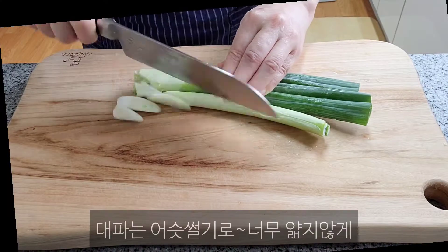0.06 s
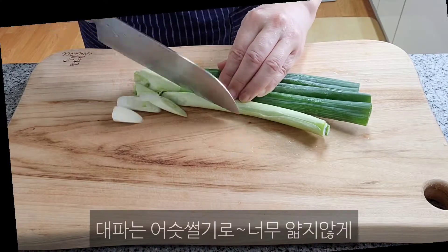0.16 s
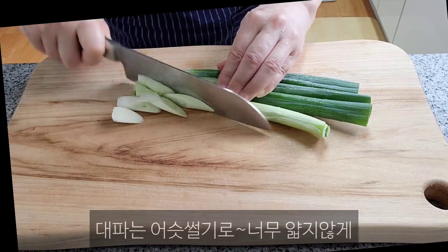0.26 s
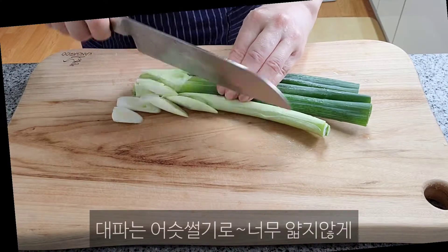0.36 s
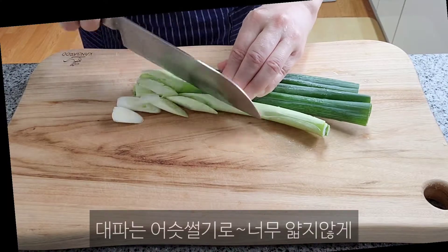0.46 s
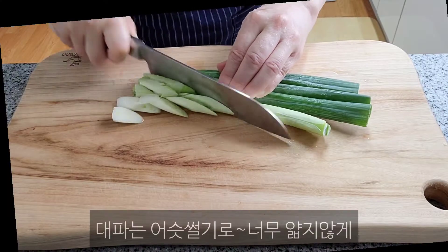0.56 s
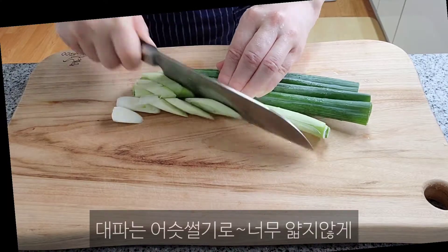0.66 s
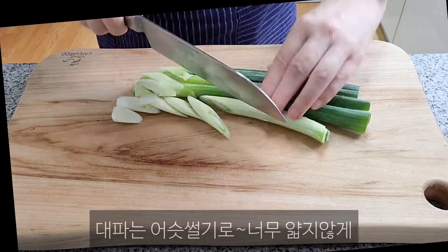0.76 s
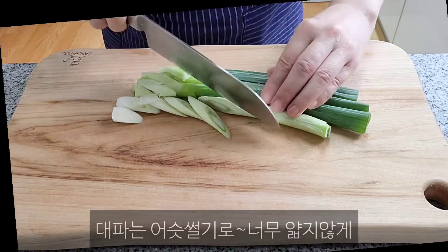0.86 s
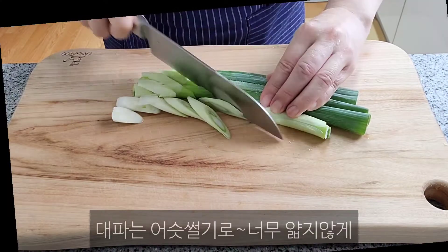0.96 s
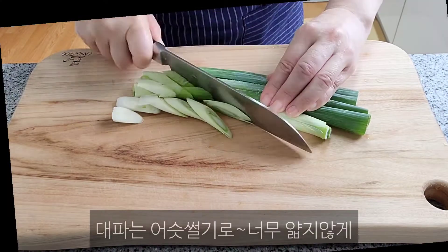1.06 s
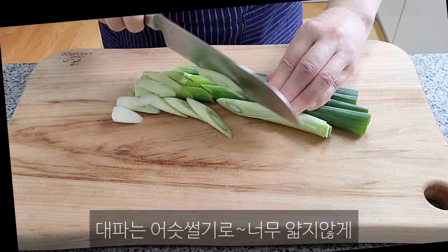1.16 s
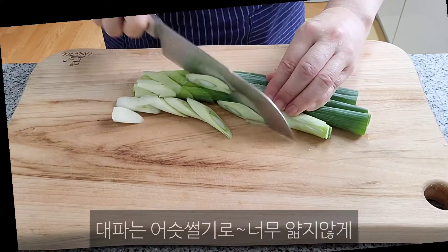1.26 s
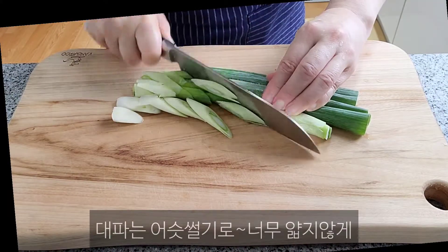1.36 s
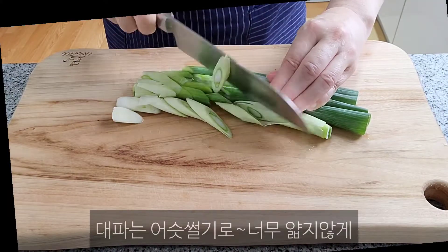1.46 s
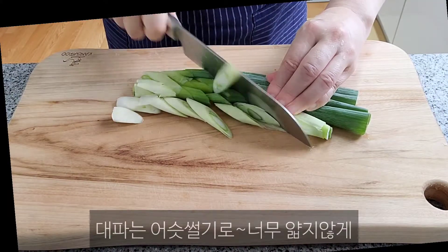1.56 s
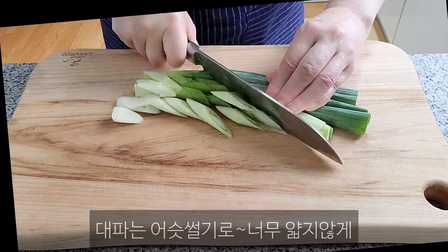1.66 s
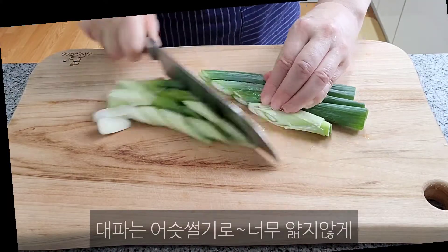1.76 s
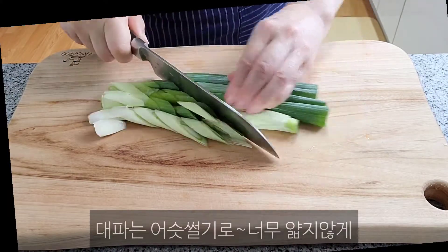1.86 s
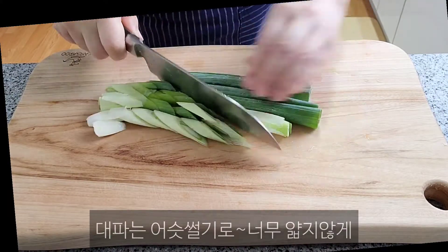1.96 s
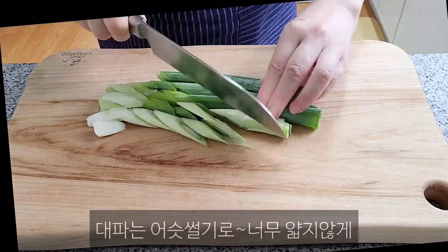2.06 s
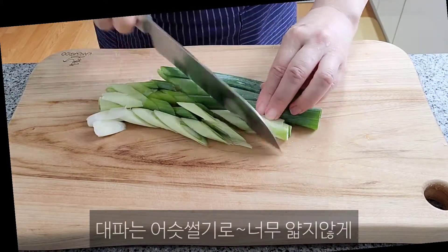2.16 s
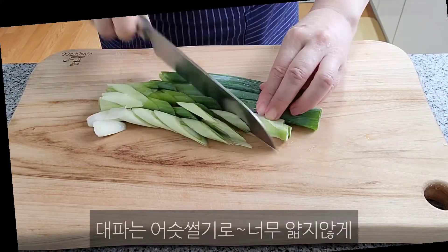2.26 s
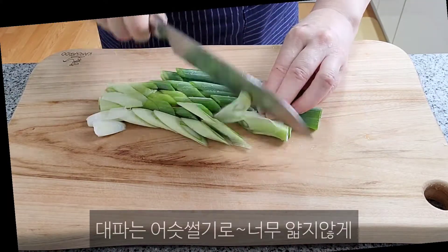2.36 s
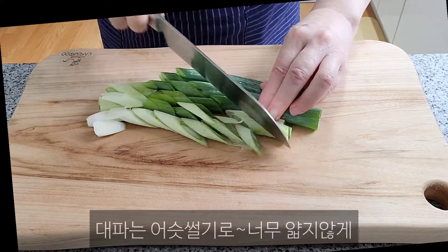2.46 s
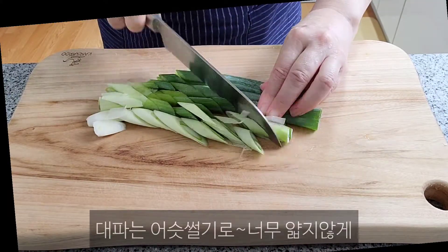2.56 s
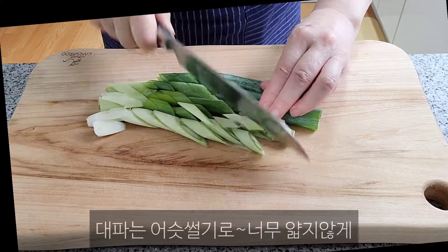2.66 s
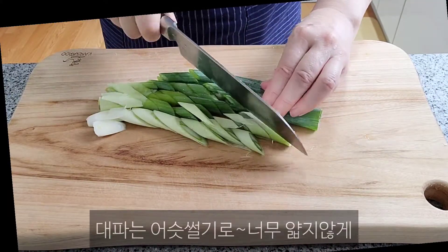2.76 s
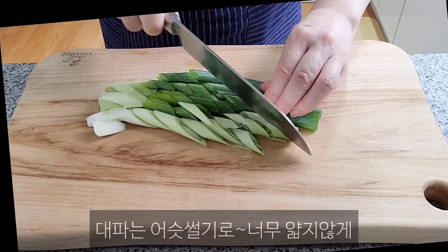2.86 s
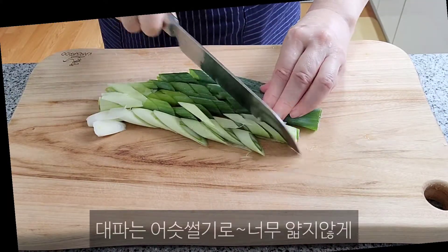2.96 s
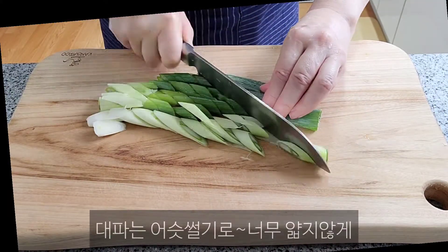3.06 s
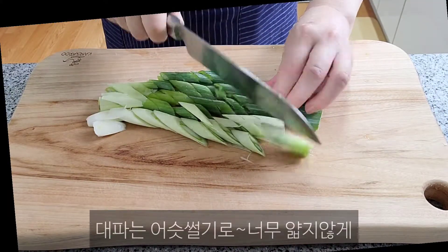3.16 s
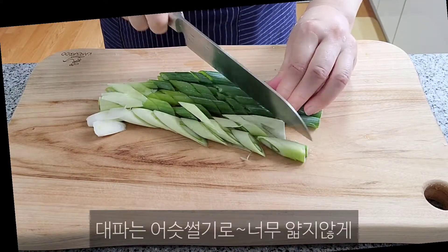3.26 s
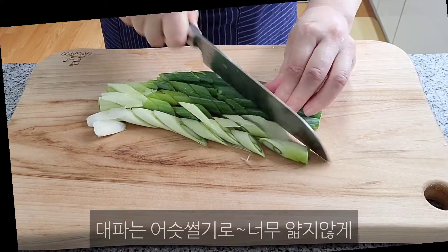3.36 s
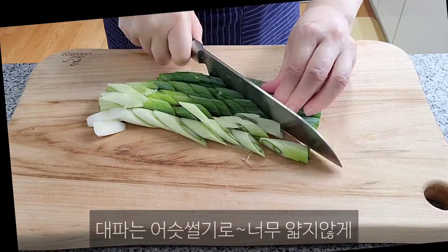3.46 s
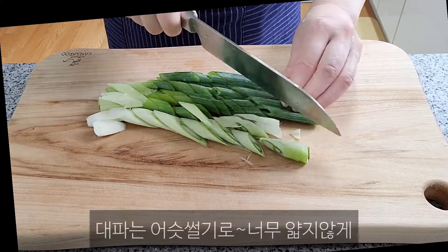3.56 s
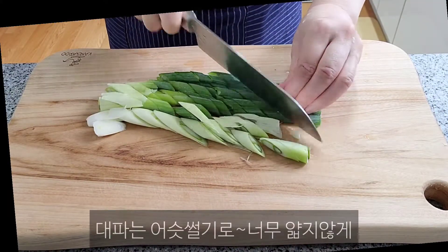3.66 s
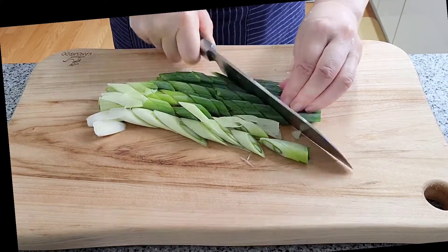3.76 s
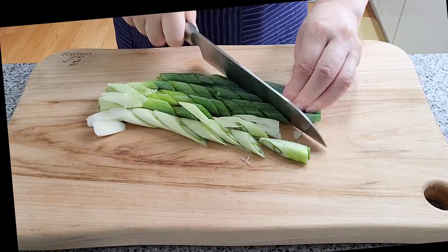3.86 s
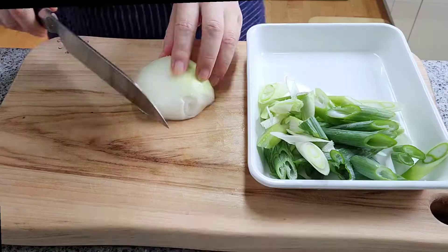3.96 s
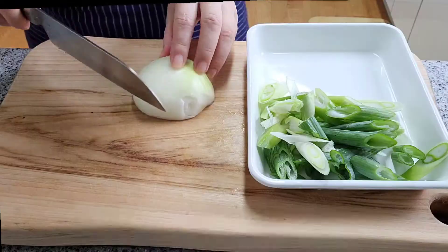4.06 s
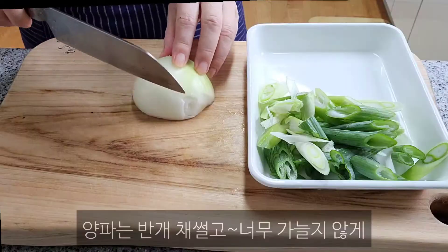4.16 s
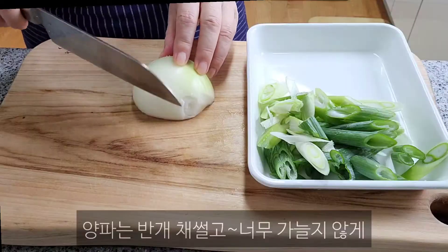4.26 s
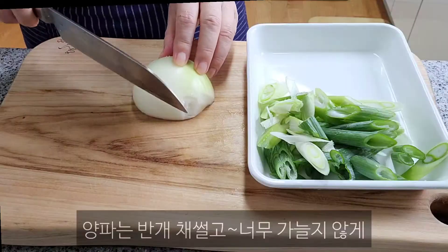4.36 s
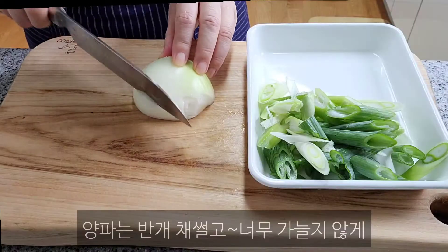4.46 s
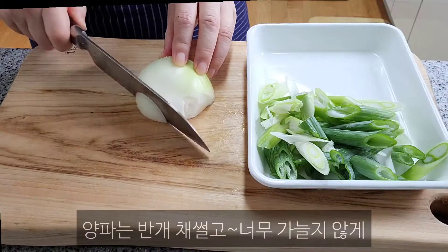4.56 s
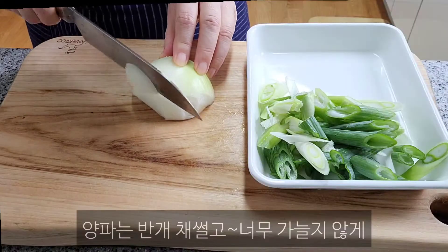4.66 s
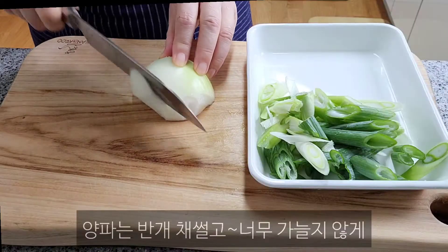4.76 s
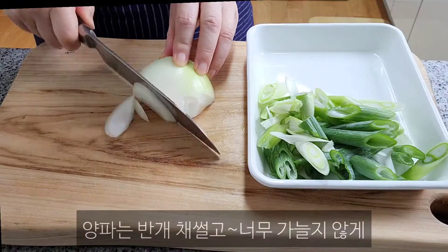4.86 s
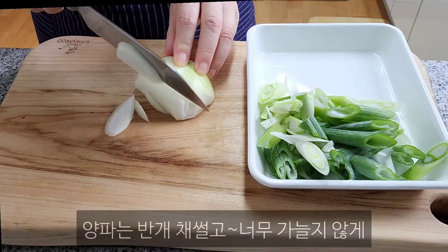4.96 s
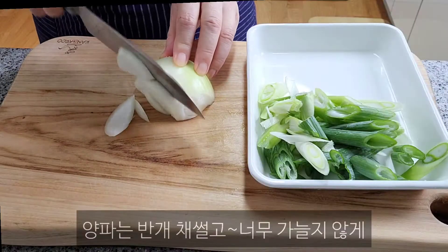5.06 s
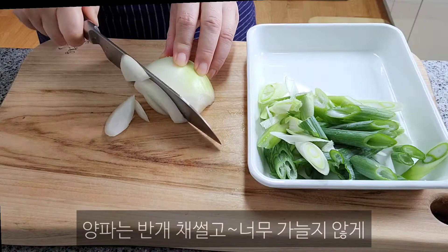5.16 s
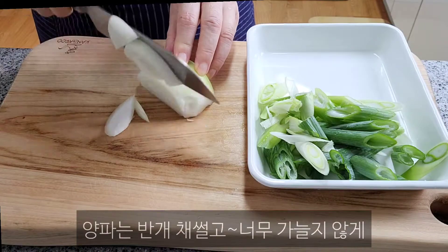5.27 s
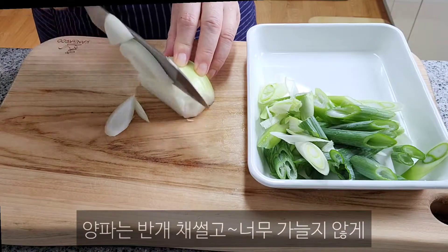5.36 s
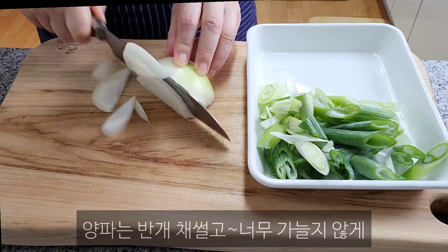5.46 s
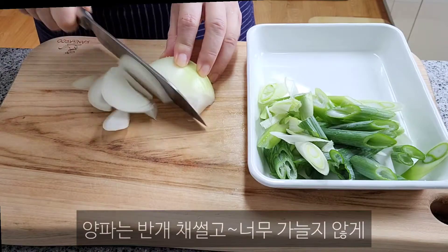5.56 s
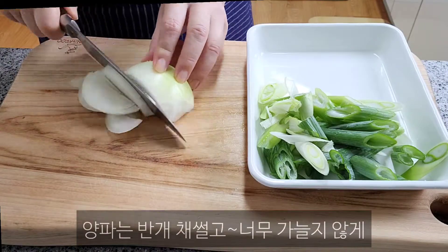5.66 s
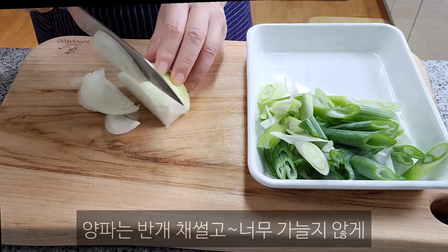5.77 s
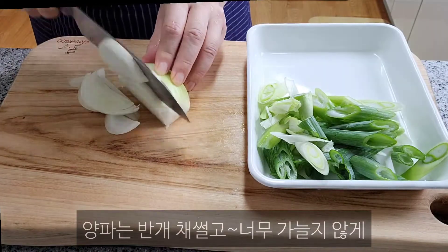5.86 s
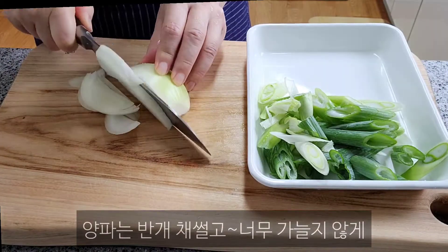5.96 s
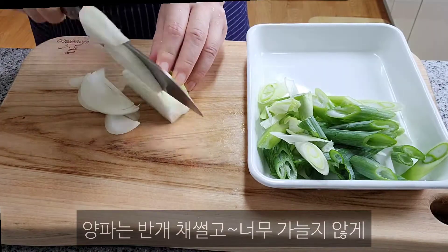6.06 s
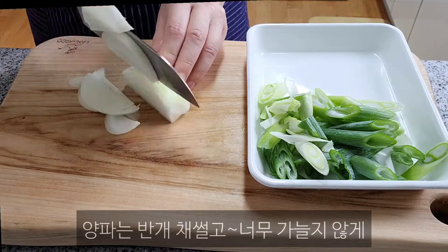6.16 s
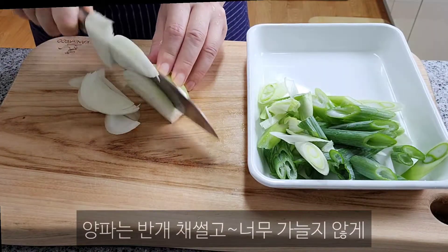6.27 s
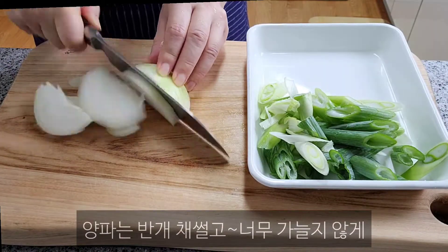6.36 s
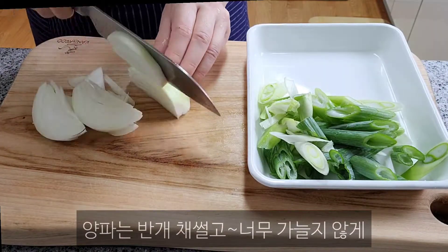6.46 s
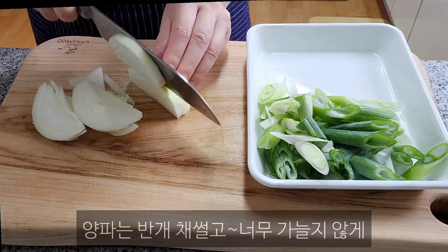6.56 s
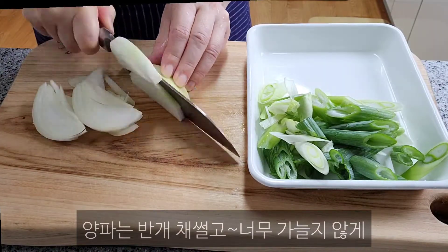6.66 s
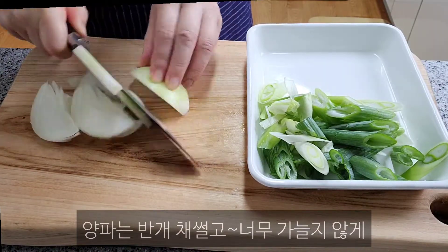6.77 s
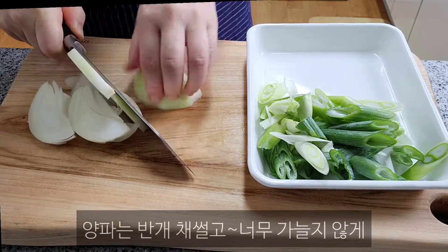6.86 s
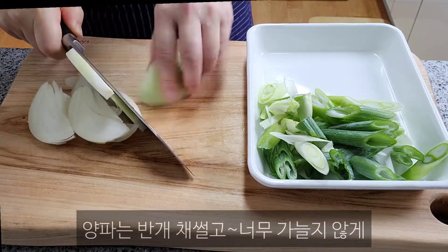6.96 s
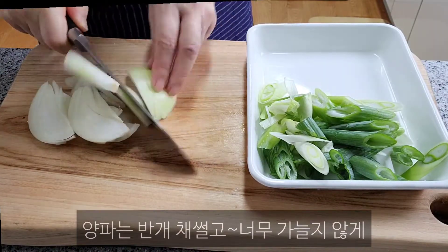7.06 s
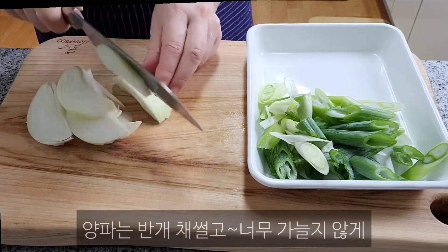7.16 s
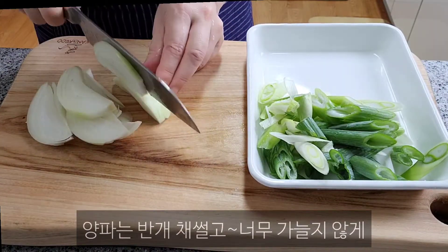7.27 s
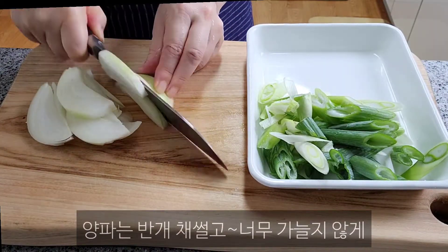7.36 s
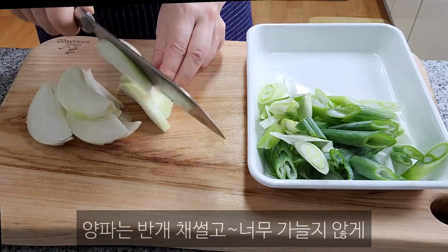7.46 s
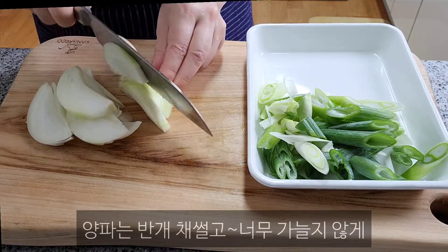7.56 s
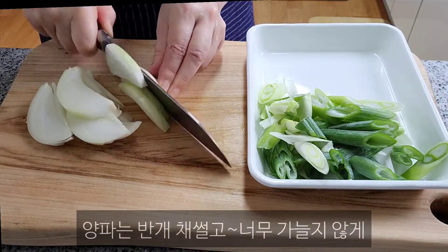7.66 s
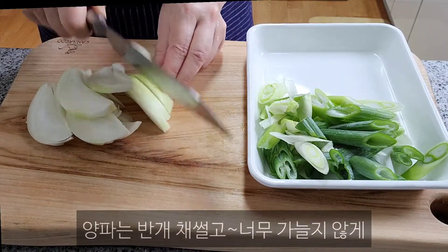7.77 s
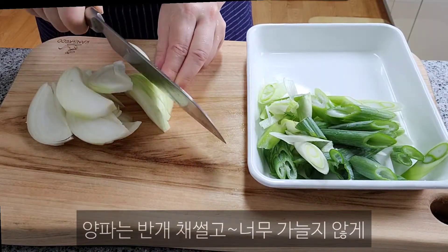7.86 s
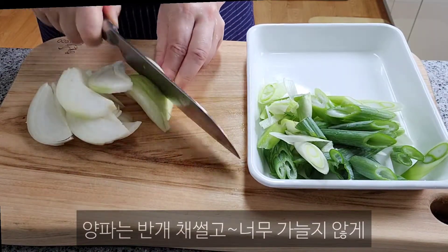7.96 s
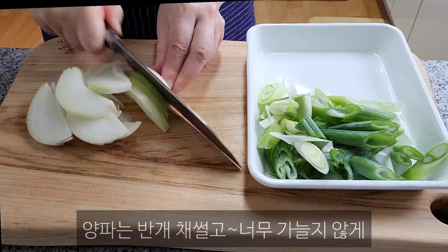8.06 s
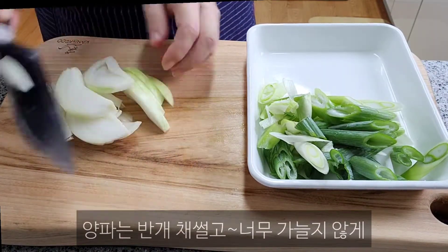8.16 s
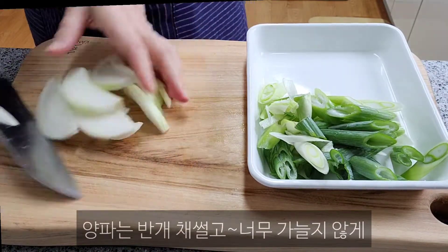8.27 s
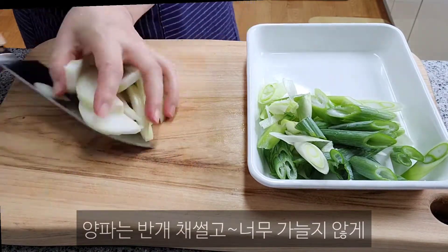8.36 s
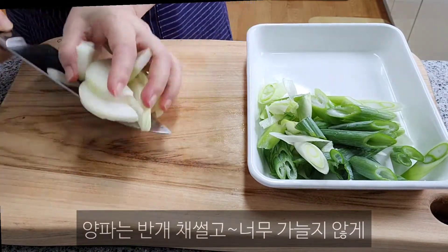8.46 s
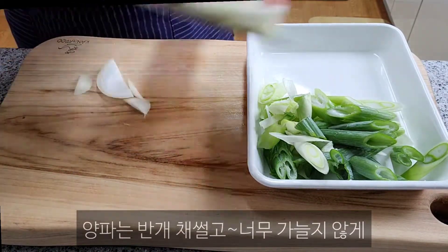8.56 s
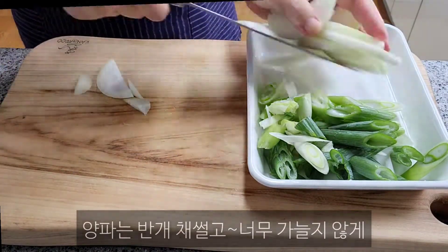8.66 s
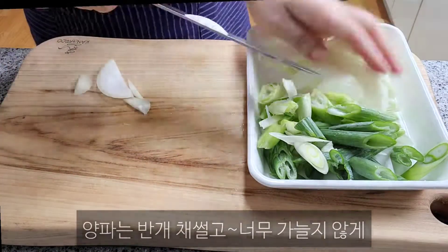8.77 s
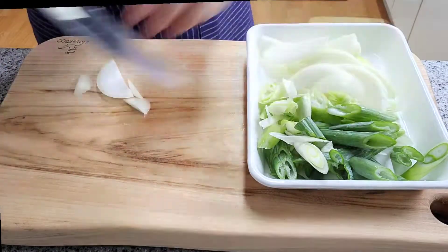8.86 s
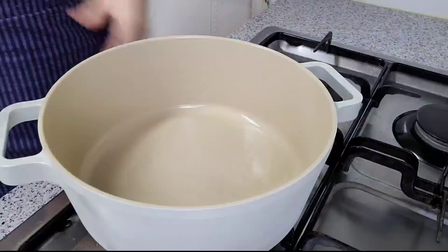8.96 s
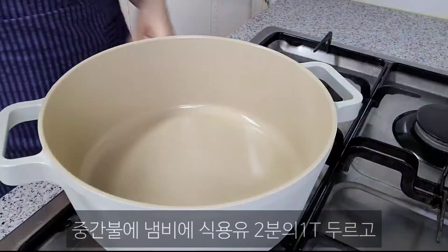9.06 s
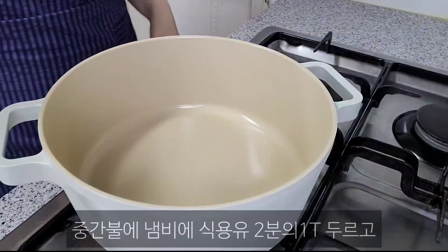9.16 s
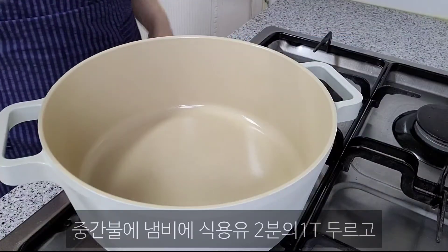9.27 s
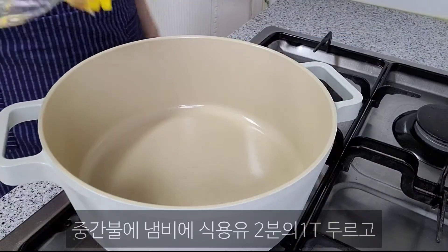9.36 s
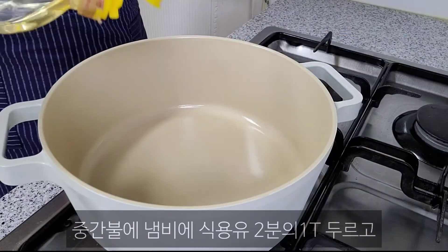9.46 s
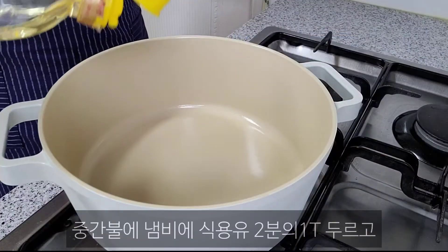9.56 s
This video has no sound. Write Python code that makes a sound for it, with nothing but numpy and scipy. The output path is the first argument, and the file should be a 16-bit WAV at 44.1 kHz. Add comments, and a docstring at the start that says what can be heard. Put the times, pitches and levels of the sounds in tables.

```python
"""Slicing onions on a wooden board

A kitchen knife slices green onion, then half an onion, on a thick wooden board close by.
Each stroke is a burst of random clicks with a singing blade and a shaken board; fibres snap as short
noise bands, the edge knocks as dents and damped wood modes, and slices rattle a tray at the end.
Low noise rumbles underneath, then gives way to a gas stove of hissing noise and wavering hum.
Two brief silences divide the scene."""
import sys
import numpy as np
from scipy import signal
from scipy.fft import rfft, irfft, next_fast_len
from scipy.io import wavfile
from scipy.ndimage import uniform_filter1d, map_coordinates

SR = 44100
rng = np.random.default_rng(int(sys.argv[2]) if len(sys.argv) > 2 else 0)


def unload_wav(signal):
    """Save mono or channel-first audio to the path in sys.argv[1] as 16-bit WAV at rate SR, clipped to [-1, 1]."""
    wavfile.write(
        sys.argv[1],
        SR,
        np.round(np.clip(np.atleast_2d(signal).T, -1, 1) * 32767).astype(np.int16),
    )


N = 423801


def amp(db):
    """Gain of a level in dB."""
    return 10 ** (np.asarray(db) / 20)


def unit(x):
    """x at rms 1."""
    return x / np.sqrt(np.mean(x ** 2) + 1e-20)


def along(points, hz):
    """Value at hz, read between (Hz, value) points on a log axis."""
    f, v = np.transpose(points)
    return np.interp(np.log(hz + 1), np.log(f + 1), v)


def wobble(rate):
    """A smooth random curve, rate knots a second."""
    knots = rng.standard_normal(int(N * rate / SR) + 4)
    return map_coordinates(knots, [np.arange(N) * rate / SR])


def ramps(t, start, end, up_db_per_s, down_db_per_s):
    """dB below the hold: a swell up to start and a fade after end."""
    return up_db_per_s * np.minimum(t - start, 0) - down_db_per_s * np.maximum(t - end, 0)


def add_at(out, start, sound):
    """Mix a sound into out from sample start."""
    out[:, start:][:, :sound.shape[1]] += sound


def filtered(x, response):
    """x times a complex response of frequency."""
    m = next_fast_len(N + SR // 2)
    return irfft(rfft(x, m) * response(np.fft.rfftfreq(m, 1 / SR)), m)[..., :N]


def resonances(modes):
    """Response of damped resonances (f/Hz, width/Hz, level/dB), added with alternating sign."""
    def response(f):
        return sum((-1) ** k * amp(db) * 1j * f * width / (centre ** 2 - f * f + 1j * f * width)
                   for k, (centre, width, db) in enumerate(modes))
    return response


# Likeness of the two ears: (f/Hz, left-right correlation)
STEREO_LIKENESS = [(60, 0.94), (180, 0.99), (550, 0.85), (1650, 0.07), (4970, 0.056), (15000, 0.056)]


def pair(two, spectrum):
    """Two unrelated signals coloured and mixed to a stereo pair of rms 1."""
    def colour(hz):
        turn = np.arccos(np.clip(along(STEREO_LIKENESS, hz), -1, 1)) / 2
        return amp(along(spectrum, hz)) * [np.cos(turn), np.sin(turn)]
    mid, side = filtered(two, colour)
    return unit(np.array([mid + side, mid - side]))


def cells(per_s, spread_db, clump_db):
    """Dense random clicks of uneven size that come in clumps of a few ms."""
    hit = rng.random((2, N)) < per_s / SR
    uneven_db = spread_db * np.minimum(rng.exponential(size=(2, N)), 4)
    size = amp(uneven_db + clump_db * wobble(150))
    return hit * size * rng.standard_normal((2, N))


def ring(modes, t, attack):
    """Damped modes that swell while the contact builds, with new strengths at every blow."""
    swell = (1 - np.exp(-t / attack)) ** 2
    scatter_db = rng.normal(0, 2, len(modes))
    return swell * sum(amp(db + d - 60 * t / t60) * np.sin(2 * np.pi * hz * t)
                       for (hz, db, t60), d in zip(modes, scatter_db))


# Strokes and slides of the blade, from bite until through: (t/s, length/s, crackle level/dB at the bite,
# level/dB halfway, level/dB when through, board level/dB relative to the crackle)
BLADE_STROKES = [(0.002, 0.056, -45, -49, -37.5, -2), (0.287, 0.093, -58, -41.5, -44, 6),
                 (0.624, 0.068, -36.5, -46, -45.5, 4), (1.066, 0.064, -43.5, -44, -37, 2.5),
                 (1.373, 0.044, -32.5, -49.5, -36.5, 3.5), (1.668, 0.057, -34.5, -50.5, -34, 4),
                 (1.868, 0.0036, -42, -42, -52.5, 6), (2.252, 0.02, -55.5, -53.5, -40.5, -1),
                 (2.318, 0.069, -59, -48, -31.5, 1), (2.587, 0.0071, -38.5, -41, -38, 3),
                 (2.686, 0.01, -33.5, -37, -34, 4.5), (2.915, 0.04, -57, -58.5, -66, -19),
                 (3.002, 0.029, -35, -55, -48.5, -6), (3.074, 0.081, -47, -36, -41.5, 2),
                 (3.387, 0.085, -56, -42.5, -63, -0.5), (3.524, 0.018, -37.5, -42.5, -38.5, 4.5),
                 (3.759, 0.081, -46.5, -40.5, -48, 4.5), (3.958, 0.034, -48.5, -61, -46.5, 6.5),
                 (4.545, 0.086, -57.5, -60.5, -41, -9), (4.851, 0.069, -50.5, -53.5, -41, -1.5),
                 (5.141, 0.1, -49.5, -56, -37.5, 3), (5.462, 0.095, -51, -52, -66, 1.5),
                 (5.558, 0.031, -49.5, -34.5, -53, 0), (5.739, 0.045, -56, -65.5, -75.5, 7),
                 (5.939, 0.0885, -50, -53, -40.5, 1.5), (6.284, 0.11, -45.5, -58.5, -36, 2.5),
                 (6.64, 0.062, -48.5, -52, -63, 2.5), (6.707, 0.024, -65, -40.5, -35.5, 3),
                 (6.738, 0.021, -44, -43, -37.5, -8), (6.841, 0.039, -60, -54.5, -68, 3),
                 (7.372, 0.088, -44.5, -50, -49, 6.5), (7.697, 0.038, -38.5, -42.5, -47.5, 4.5),
                 (7.754, 0.0091, -39, -46, -36.5, 6), (8.034, 0.065, -45, -54.5, -44.5, 7.5),
                 (8.364, 0.042, -59, -59.5, -61.5, 4)]
# Fingers and loose slices rubbing: (loudest t/s, level/dB, swell/s, fade/s)
LOOSE_RUBS = [(0.759, -64, 0.028, 0.057), (1.919, -71.5, 0.39, 0.21), (3.2, -63, 0.26, 0.21),
              (3.89, -59.5, .15, 0.14), (5.649, -65.5, .08, 0.16), (7.06, -75, 0.073, 0.097),
              (7.188, -75.5, 0.067, 0.099), (8.339, -60.5, 0.014, 0.12), (8.501, -65, .15, 0.084),
              (8.8, -64, 0.058, 0.037)]
# Colour of the bursting cells: (f/Hz, level/dB per Hz)
CRACKLE_SPECTRUM = [(880, -34), (1500, -13.5), (1970, -2.5), (2680, -8), (3000, 2.5), (4390, -16),
                    (5310, -6), (7620, -16.5), (14500, -19), (15900, -17.5), (16500, -32)]
# Singing modes of the blade: (f/Hz, width/Hz, level/dB)
BLADE_MODES = [(1900, 500, 1), (3100, 170, -6), (4025, 250, 1), (4720, 130, 2), (4930, 47, -15)]
# Grinding modes of the wood: (f/Hz, width/Hz, level/dB)
WOOD_MODES = [(714, 260, 1.5), (1240, 240, -4), (1460, 93, -4)]
# How fast crackle swells to the bite and dies once through: (dB/s up, dB/s down)
STALKS, BULB = (850, 937), (17000, 6100)
BULB_S = 4.3  # strokes from here on cut the half onion
# The board carries more as the edge nears it (stalks, bulb), and little before the bite
PRESS_DB_PER_S, LEAD_DB_PER_S = (148, 71.5), 302
RUSTLE_SPAN_DB = 19  # rise over a rub's swell time, and fall over its fade time


def slicing():
    """Bursting cells fizz in the air, set the blade singing and shake the board; loose slices rub."""
    (air, board), clock = np.zeros((2, N)), np.arange(N) / SR
    for s, length, bite_db, half_db, through_db, share_db in BLADE_STROKES:
        end = s + length
        near = slice(max(round(s * SR) - SR // 5, 0), round(end * SR) + SR // 5)
        t = clock[near]
        db = np.interp(t, [s, (s + end) / 2, end], [bite_db, half_db, through_db])
        db = db + ramps(t, s, end, *(STALKS if s < BULB_S else BULB))
        press_db = np.clip(PRESS_DB_PER_S[int(s > BULB_S)] * (t - end), -22, 8)
        lead_db = LEAD_DB_PER_S * np.minimum(t - s, 0)
        air[near] += amp(db)
        board[near] += amp(db + share_db + press_db + lead_db)
    loose = sum(amp(db + ramps(clock, s, s, RUSTLE_SPAN_DB / up, RUSTLE_SPAN_DB / down))
                for s, db, up, down in LOOSE_RUBS)
    flat = [(100, 0)]
    fizz = pair(cells(12000, spread_db=1.8, clump_db=2.7), CRACKLE_SPECTRUM)
    # each blade mode wakes at its own moments
    singing = [amp(4.5 * wobble(40)) * filtered(cells(1500, spread_db=2, clump_db=2.5), resonances([mode]))
               for mode in BLADE_MODES]
    blade = pair(sum(singing), flat)
    grind = pair(filtered(cells(2200, spread_db=2.5, clump_db=4.5), resonances(WOOD_MODES)), flat)
    rustle = pair(cells(4000, spread_db=2.2, clump_db=4.5), CRACKLE_SPECTRUM)
    cut = air * (amp(-1.0) * fizz + amp(-3.5) * blade)
    return cut + amp(-2.0) * board * grind + loose * (rustle + 0.25 * blade)


# Edge on wood: (t/s, level/dB, board pitch f/Hz, octave level/dB, hardness level/dB,
# counter thud level/dB before its cap)
EDGE_KNOCKS = [(0.016, -26.5, 702, -12, -8, -13), (0.334, -22, 665, -9, -12.5, -22),
               (0.373, -34, 735, -5, -19, -4), (0.635, -27, 633, -9, -11, -13),
               (1.38, -25.5, 635, -11, -36.5, -22), (1.421, -18, 730, -17, -13, -19.5),
               (1.672, -28.5, 688, -16, -25, -22), (1.725, -24, 947, -6, -10.5, -9),
               (1.978, -31, 694, -10, -36, -38), (2.276, -15.5, 721, -18.5, -29.5, -36.5),
               (2.374, -28.5, 713, 0.5, -10, -29), (2.398, -26, 720, -10, -17.5, -11.5),
               (2.684, -23.5, 870, -8, -13.5, -14.5), (2.704, -26.5, 710, -9, -26, -18.5),
               (3.001, -30, 676, -8.5, -10.5, -18.5), (3.119, -20.5, 1060, -19.5, -28, -55),
               (3.144, -28.5, 835, -10, -23, -11), (3.547, -45.5, 610, -6.5, -20.5, 8.5),
               (3.8386, -32.5, 718, -8, -19.5, -23.5), (3.906, -24, 686, -22, -23.5, -45.5),
               (4.034, -27, 728, -11, -20.5, -26), (4.627, -10, 719, -3, -9.5, -54),
               (4.924, -11, 717, -9, -14, -28.5), (5.237, -9, 730, -15.5, -24, -29),
               (5.578, -22, 620, -10, -23, -13), (6.03, -12, 742, -11, -16, -20.5),
               (6.3936, -4.5, 744, -17.5, -9, -34), (6.7584, -7, 735, -7, -11, -26.5),
               (6.946, -37, 754, -3.5, -3.5, -34), (7.169, -42.5, 649, -13.5, -23.5, -2),
               (7.4488, -21, 706, -5.5, -21.5, -12.5), (7.762, -10.5, 718, -6, -17.5, -23.5),
               (8.094, -10.5, 740, -4, -9, -24.5), (8.332, -38.5, 700, -4, -4, -6.5),
               (8.566, -54, 697, 7, 6, -23.5)]
# Board modes, the upper ones raised or lowered by each knock: (multiple of pitch, level/dB, t60/s)
BOARD_MODES = [(.48, -17, 0.014), (1, -9, 0.037), (1.549, -1, 0.014), (1.95, -8, 0.019), (2.951, -7, 0.015),
               (4.4, -26.5, 0.014)]
# Counter modes behind the thud: (f/Hz, level/dB, t60/s)
COUNTER_MODES = [(78.6, -4.5, 0.068), (116.4, 2.5, 0.039), (240, -3.5, 0.035)]


def knocks():
    """The edge dents the wood with overtones, then weaker board modes, grit and a late low thud."""
    out, t = np.zeros((2, N + SR)), np.arange(SR // 8) / SR
    lag = SR // 170  # the counter answers after the board
    u = t - .005  # time from the middle of the dent
    after = np.maximum(t - .0045, 0)
    for s, db, hz, octave_db, hard_db, thud_db in EDGE_KNOCKS:
        modes = []
        for k, level, t60 in BOARD_MODES:
            extra_db = 0 if k < 1.7 else 10 + (octave_db if k < 2.5 else hard_db)
            modes.append((k * hz * rng.normal(1, .03), level + extra_db, t60))  # every spot differs
        turn = 2 * np.pi * hz * u
        tones = np.cos(1.111 * turn) - amp(octave_db) * np.cos(1.95 * turn) + amp(hard_db) * np.cos(2.9 * turn)
        dent = np.exp(-(u / 0.0012) ** 2) * tones
        mid = 0.9 * dent + amp(-8.5) * ring(modes, after, attack=0.00037)
        side = rng.choice([-1, 1]) * amp(-10) * ring(modes, after, attack=0.00099)
        band = signal.butter(2, [400, 3200], "band", fs=SR)
        grit = signal.lfilter(*band, rng.standard_normal((2, len(t))))
        # a short and a long fade
        grit *= amp(-18 - 60 * after / 0.04) + amp(-35.5 - 60 * after / 0.1)
        grit *= np.exp(np.minimum(u, 0) / 0.00091)
        # capped so that no thud is loud; a little weaker in the left ear than in the right
        thud = amp(min(thud_db, -29 - db)) * ring(COUNTER_MODES, t, attack=.004) * amp([[-.8], [.8]])
        thud = amp(db + 12) * thud
        at = round((s - .0036) * SR)
        add_at(out, at, amp(db + 1.0) * (np.array([1.08 * mid + side, mid - side]) + grit))
        add_at(out, at + lag, thud)
    return out[:, :N]


# Single fibres and slices snapping: (t/s, level/dB, centre f/Hz)
FIBRE_SNAPS = [(0.0571, -22, 3360), (0.3047, -24.5, 2940), (0.3166, -28.5, 4100), (0.361, -21, 2000),
               (0.609, -22, 2010), (0.6183, -19, 3140), (0.666, -19, 3130), (1.072, -12.5, 2200),
               (1.094, -21, 4700), (1.0955, -22, 3000), (1.1136, -24, 2480), (1.1673, -21.5, 1920),
               (1.2224, -44, 2410), (1.3584, -19.5, 1960), (1.6596, -17, 2690), (1.8514, -20, 2890),
               (2.274, -22, 2084), (2.3618, -17, 2990), (2.3792, -19.5, 5130), (2.3905, -22, 5400),
               (2.587, -17.5, 2890), (2.9992, -19, 1940), (3.093, -28, 2850), (3.2812, -26.5, 2190),
               (3.3244, -42.5, 2590), (3.3877, -39, 1830), (3.418, -28, 3890), (3.5174, -18.5, 1900),
               (3.7179, -43, 2900), (3.7582, -25, 2100), (3.776, -21, 2830), (3.7885, -18, 2400),
               (3.7966, -13, 2900), (3.812, -19.5, 5750), (3.8751, -36.5, 3960), (3.9697, -19, 6200),
               (3.9953, -42.5, 2180), (4.851, -37.5, 2160), (4.9093, -26, 2015), (5.154, -29.5, 2400),
               (5.2266, -27, 4270), (5.403, -47, 5600), (5.449, -39, 3060), (5.462, -25, 3320),
               (5.567, -23, 3040), (5.976, -31, 2654), (6.285, -29, 3070), (6.3762, -20, 2610),
               (6.4712, -43.5, 2160), (6.6432, -48.5, 2970), (6.7265, -12.5, 3005), (6.945, -31, 3280),
               (7.4, -31, 3550), (7.6287, -41.5, 2050), (7.6971, -21.5, 2000), (7.7198, -18.5, 3330),
               (7.9781, -41.5, 3520), (8.036, -28.5, 2290), (8.0652, -32.5, 3600), (8.3314, -21.5, 3140),
               (8.5055, -42.5, 3203)]
# Faint ticks of slices that drop off the blade between cuts: (t/s, level/dB, centre f/Hz)
SLICE_TICKS = [(0.218, -48.5, 2500), (0.248, -52, 3470), (0.5556, -53, 3560), (0.75, -46.5, 5370),
               (0.955, -45, 3550), (.9906, -53, 5850), (1.3205, -41.5, 2600), (1.6105, -42, 2830),
               (1.804, -37.5, 1890), (2.2368, -52, 2730), (2.318, -30.5, 3070), (2.516, -53, 2700),
               (2.875, -50, 4530), (3.2076, -34.5, 2190), (3.494, -35, 3960), (4.3226, -59.5, 2960),
               (4.6894, -61, 4070), (5.006, -59, 4000), (5.691, -48.5, 3050), (5.917, -35.5, 4030),
               (6.45, -54, 5100), (7.191, -59, 4070), (7.301, -52.5, 5440), (7.642, -48, 3000),
               (7.803, -51, 4000), (8.173, -53, 3310), (8.387, -26, 1140), (8.4532, -47.5, 2010),
               (9.452, -52, 1217)]
SNAP_S, TICK_S = (0.0004, 0.023), (0.0012, 0.045)  # (attack/s, t60/s)


def snaps():
    """Fibres click dry, dropping slices softer: noise around a pitch, unlike in the two ears."""
    out, t = np.zeros((2, N + SR)), np.arange(SR // 30) / SR
    clicks = [(*row, *SNAP_S) for row in FIBRE_SNAPS] + [(*row, *TICK_S) for row in SLICE_TICKS]
    for s, db, hz, attack, t60 in clicks:
        crack = rng.standard_normal((2, len(t))) + .5 * rng.standard_normal(len(t))
        band = signal.lfilter(*signal.butter(1, [hz / 1.2, hz * 1.2], "band", fs=SR), crack)
        tone = np.sin(2 * np.pi * hz * t)
        envelope = amp(db - 60 * t / t60) * (1 - np.exp(-t / attack)) ** 2
        click = 0.21 * amp(-60 * t / 0.0083) * crack + 1.1 * band + 0.19 * tone
        add_at(out, round(s * SR), envelope * click)
    # thin the lows below 700 Hz and soften the treble above 8.5 kHz
    return filtered(out[:, :N], lambda f: 1j * f / (700 + 1j * f) / (1 + 1j * f / 8500) ** 2)


# Slices landing in the tray: (t/s, level/dB, hardness level/dB)
TRAY_TAPS = [(8.768, -32, 1), (8.791, -31.5, 3.5), (8.8174, -37.5, -14)]
# Ringing modes of the tray: (f/Hz, level/dB, t60/s)
TRAY_MODES = [(730, -2, 0.029), (1120, -1, 0.021), (1910, -8, 0.027), (2470, -10, 0.029),
              (3600, -7.5, 0.031), (4080, -17, 0.041), (5700, -27, 0.013)]


def tray():
    """Each slice that lands rattles the enamel tray briefly, a hard one in its upper modes too."""
    out, t = np.zeros((2, N + SR)), np.arange(SR // 8) / SR
    for s, db, hard_db in TRAY_TAPS:
        modes = [(hz * rng.normal(1, .03), level + hard_db * (hz > 1500), t60)
                 for hz, level, t60 in TRAY_MODES]
        rough = 1 + 2.5 * uniform_filter1d(rng.standard_normal((2, len(t))), size=24)
        band = signal.butter(2, [600, 4500], "band", fs=SR)
        grit = signal.lfilter(*band, rng.standard_normal((2, len(t))))
        grit *= amp(-10 + .5 * hard_db - 60 * t / .05) * (1 - np.exp(-t / .001))
        rattle = np.array([ring(modes, t, attack=0.0011), ring(modes, t, attack=0.0006)])
        add_at(out, round(s * SR), amp(db) * (rough * rattle + grit))
    return out[:, :N]


# Decay of the room's answer: (f/Hz, t60/s)
WALL_DECAY = [(200, 0.33), (800, 0.021), (2500, 0.055), (10000, 0.019)]


def walls(x):
    """Each frequency dies at its own speed; a fresh random tail every quarter second varies the answer."""
    out, step = np.zeros((2, N + SR)), SR // 4
    for start in range(0, N, step):
        hz, t, z = signal.stft(rng.standard_normal((2, SR // 6)), SR, nperseg=128)
        decay = amp(-60 * t / along(WALL_DECAY, hz)[:, None])
        tail = signal.istft(z * decay, SR, nperseg=128)[1]
        tail[1] = 0.5 * tail[0] + 0.73 * tail[1]  # the ears hear partly the same tail
        wet = signal.fftconvolve(x[None, start:start + step], tail / np.linalg.norm(tail[0]), axes=1)
        add_at(out, start + 150, wet)
    return out[:, :N]


# Colour of the room rumble: (f/Hz, level/dB per Hz)
KITCHEN_SPECTRUM = [(12, -32), (20, 2), (70, -1.5), (93, 0.5), (172, -5), (204, -7.5), (607, -26.5),
                    (976, -30), (3250, -46), (4500, -50), (5500, -47), (7000, -52.5), (16000, -59)]
# Colour of the burner hiss: (f/Hz, level/dB per Hz)
STOVE_SPECTRUM = [(12, -41), (20, -14.5), (65, 2), (116, -16), (285, -18), (459, -24), (513, -18),
                  (897, -27), (2390, -36.5), (3340, -38), (7310, -42), (8800, -42.5), (9950, -39.5),
                  (16000, -53)]
# Whistling bands of the gas jets, filtered twice: (f/Hz, width/Hz per pass, level/dB per pass)
JET_BANDS = [(3240, 75, 1), (4190, 111, 0.5), (5380, 320, -4.5), (7970, 130, 0), (9650, 81, 0),
             (10300, 70, -0.5), (10535, 70, -4)]
# Wavering tones at the stove: (f/Hz, level/dB)
HUM_TONES = [(59.2, -60), (118.4, -73), (279.9, -73.5), (360.7, -80.5), (520.8, -73), (705.2, -78.5)]
KITCHEN_DB, STOVE_DB, JETS_DB = -56, -63, -82  # levels before the stereo balance and final gain
STOVE_S = 9.0  # the stove takes over from the rumble


def background():
    """Room rumble over the board; burner hiss, whistling jets and wavering tones at the stove."""
    t = np.arange(N) / SR
    stove = 1.0 * (t > STOVE_S)
    rumble = amp(KITCHEN_DB + 0.29 * wobble(3.5)) * pair(rng.standard_normal((2, N)), KITCHEN_SPECTRUM)
    hiss = amp(STOVE_DB) * pair(rng.standard_normal((2, N)), STOVE_SPECTRUM)
    whistle = filtered(rng.standard_normal((2, N)), lambda f: resonances(JET_BANDS)(f) ** 2)
    jets = amp(JETS_DB + 2.5 * wobble(12)) * unit(whistle)
    hum = sum(amp(db + 1.6 * wobble(10)) * np.sin(2 * np.pi * hz * t + 0.28 * wobble(14))
              for hz, db in HUM_TONES)
    balance = amp([[-.7], [.7]])  # dB, left and right
    return ((1 - stove) * rumble + stove * (hiss + jets + hum)) * balance


# Brief silences: (from t/s, to t/s)
SILENCES = [(4.049, 4.072), (8.994, 9.007)]
GAIN_DB = 2


def scene():
    """Knife, board, tray, room and background, with all sound off in the brief silences."""
    near, t = knocks() + slicing() + snaps() + tray(), np.arange(N) / SR
    heard = np.prod([(t < start) | (t > end) for start, end in SILENCES], axis=0)
    room = amp(-22.5) * walls(near.mean(axis=0))
    return (near + room + background()) * amp(GAIN_DB) * heard


TOP_HZ = 15900


def record(dry):
    """A steep low-pass removes the treble above the band limit."""
    return filtered(dry, lambda hz: 1 / (1 + (hz / TOP_HZ) ** 120))


dry = scene()
out = record(dry)
unload_wav(out)
```